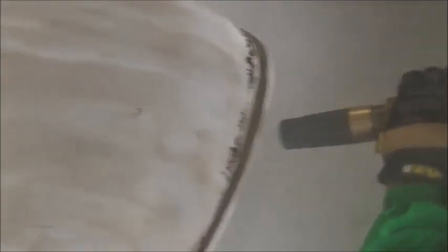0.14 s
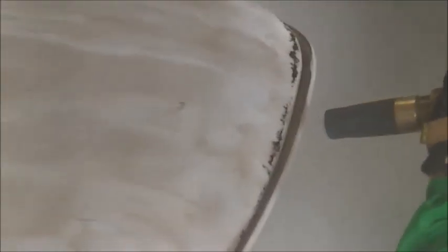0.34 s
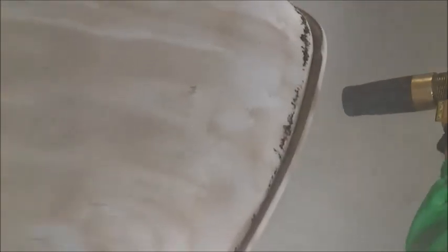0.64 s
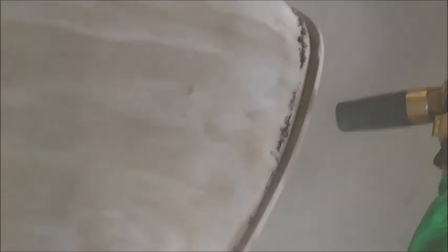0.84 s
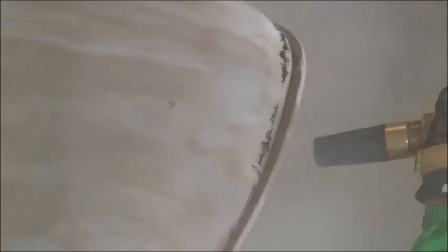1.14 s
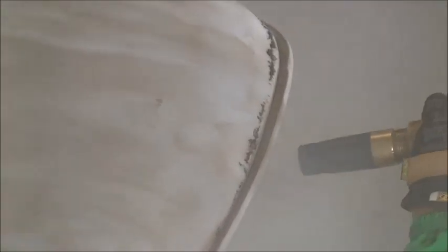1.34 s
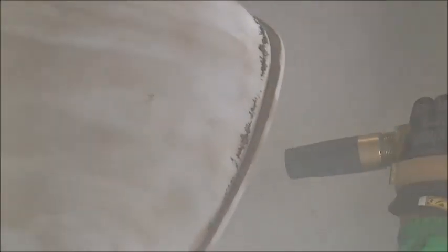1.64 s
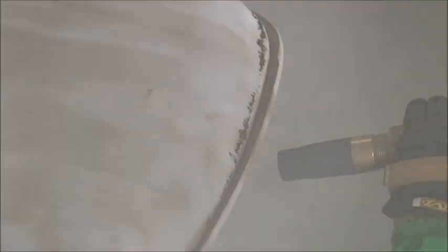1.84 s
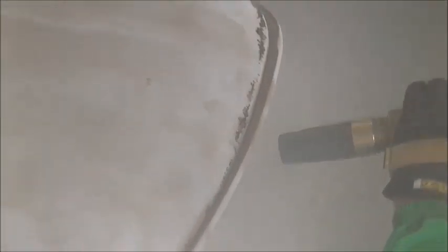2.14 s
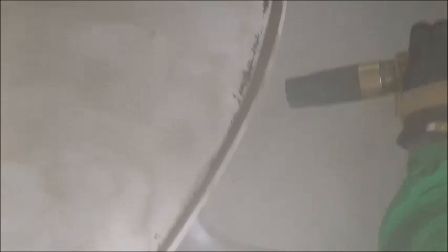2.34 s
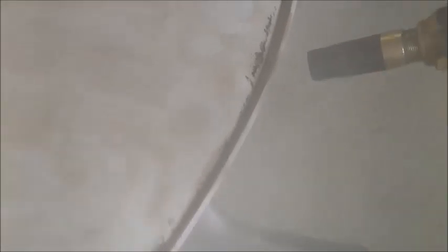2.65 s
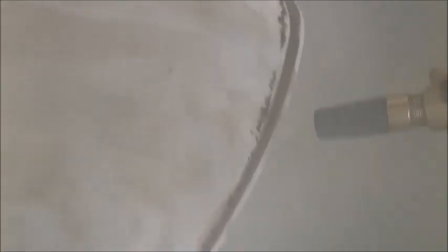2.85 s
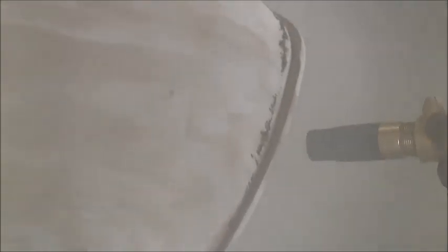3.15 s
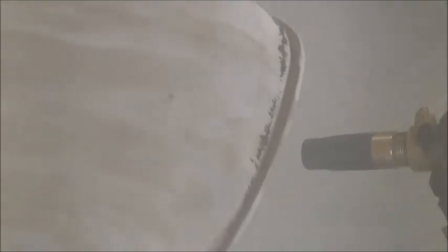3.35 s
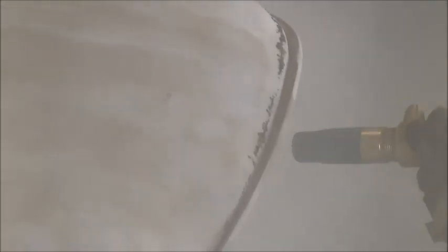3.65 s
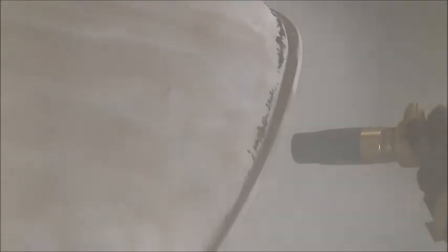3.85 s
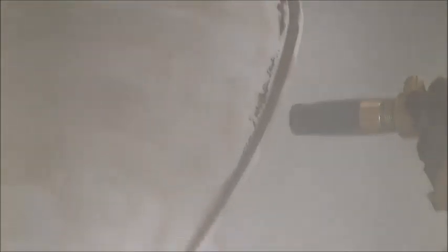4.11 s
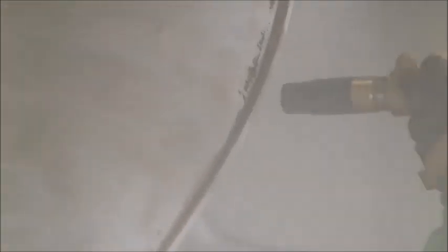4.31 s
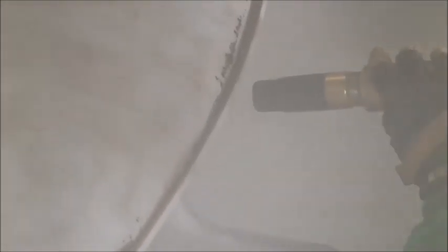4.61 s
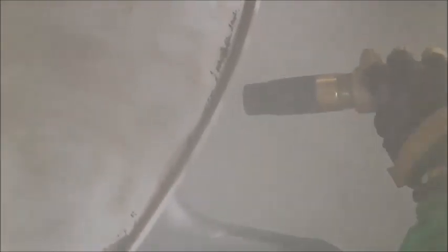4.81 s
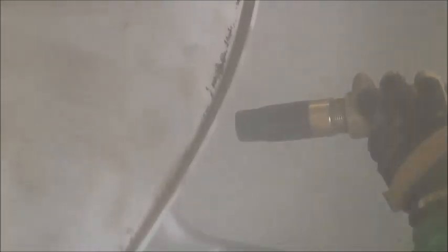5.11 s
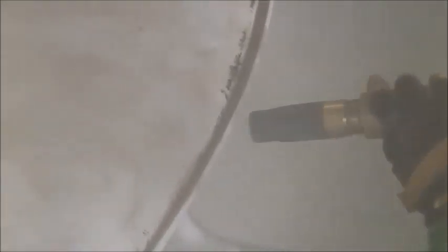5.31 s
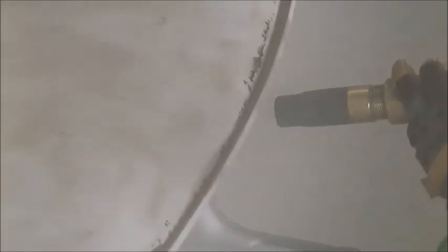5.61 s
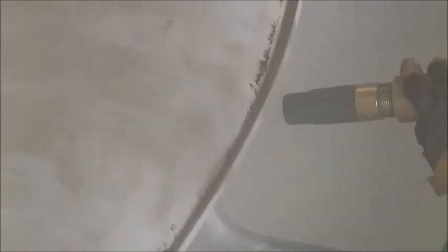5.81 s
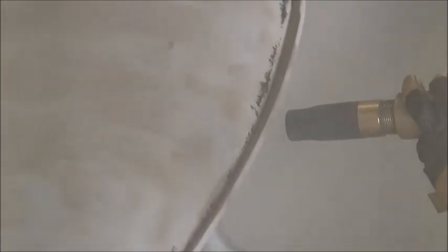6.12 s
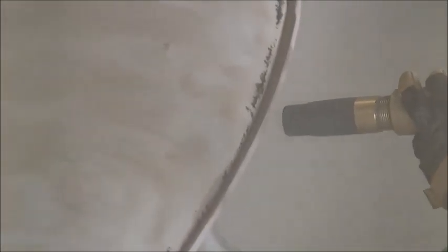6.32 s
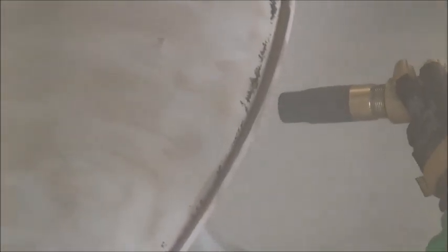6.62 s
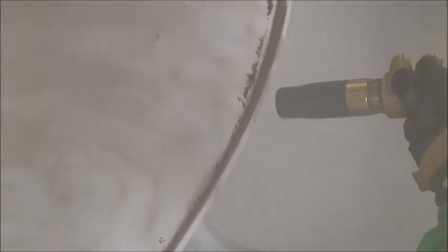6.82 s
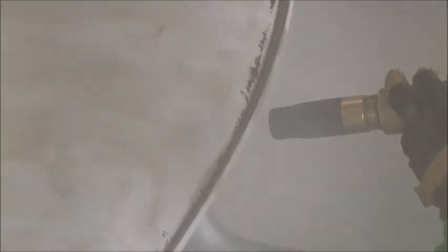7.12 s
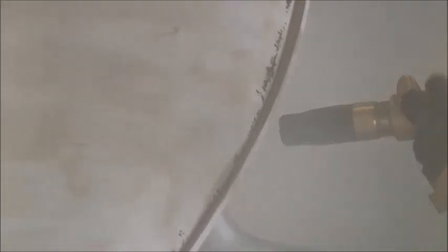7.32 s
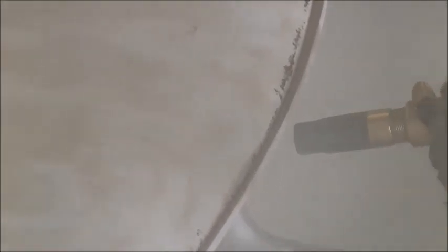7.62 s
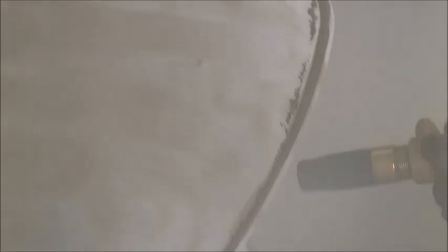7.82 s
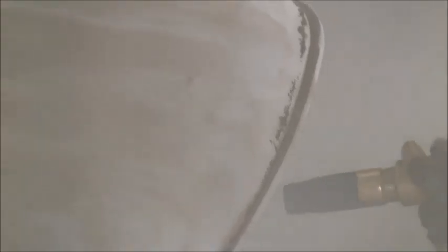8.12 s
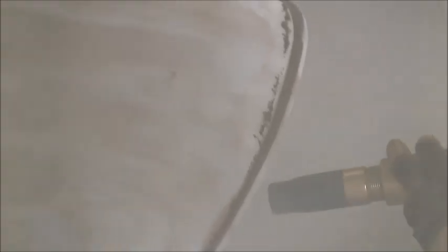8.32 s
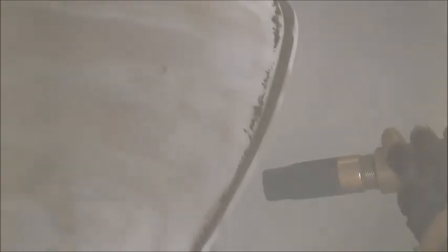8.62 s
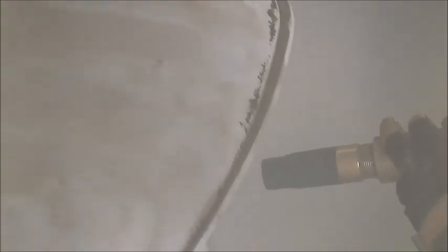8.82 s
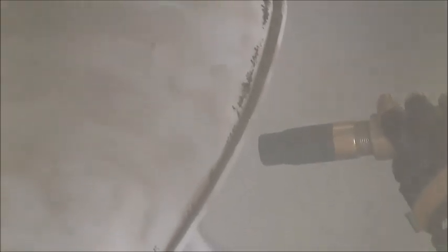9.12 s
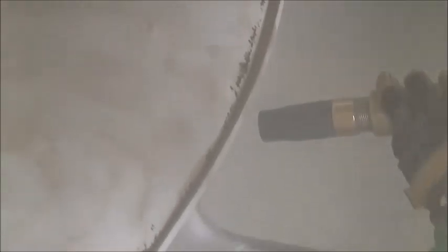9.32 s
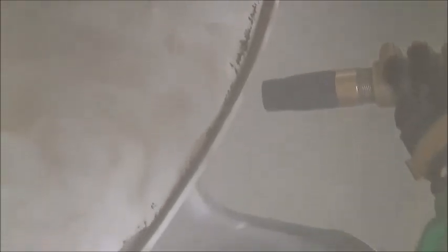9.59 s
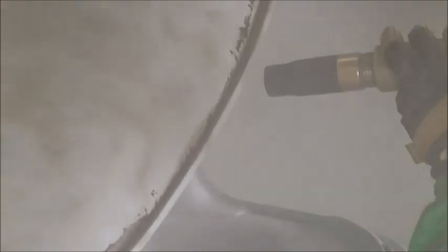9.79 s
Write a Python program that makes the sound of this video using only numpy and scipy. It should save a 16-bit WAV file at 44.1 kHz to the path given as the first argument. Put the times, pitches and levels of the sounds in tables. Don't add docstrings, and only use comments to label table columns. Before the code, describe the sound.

A loud, steady blast of compressed air and grit hisses against a steel panel, with a faint high whistle appearing late over low fan hum.

```python
import sys
import numpy as np
from scipy import signal
from scipy.fft import rfft, irfft
from scipy.io import wavfile
from scipy.ndimage import uniform_filter1d, map_coordinates

SR = 44100
rng = np.random.default_rng(int(sys.argv[2]) if len(sys.argv) > 2 else 0)


def generate_wav(signal):
    frames = np.transpose(np.atleast_2d(signal))
    scaled = np.clip(frames, -1, 1) * 32767
    pcm = np.round(scaled).astype(np.int16)
    wavfile.write(sys.argv[1], SR, pcm)


def boost_factor(decibels):
    exponent = np.asarray(decibels, float) / 20
    return 10 ** exponent


N = 438794

# t/s, jet strength/dB, how squarely it faces the panel/dB
NOZZLE_MOTION = [(0, -21, -9.2), (.5, -21, -9.5), (.9, -21.5, -9), (1.1, -21, -8), (2.3, -20.9, -8.5),
                 (3.3, -21.5, -9), (3.6, -21, -9), (4.3, -20.9, -9.5), (4.6, -21, -9.5),
                 (6.2, -21.5, -10.5), (6.8, -21.5, -10.5), (7.05, -21, -10.5), (7.6, -21, -10),
                 (8.05, -21.5, -11.5), (8.8, -21, -10.5), (9.75, -21.5, -10.5), (9.95, -20.5, -9.5)]


def unit(x):
    return x / np.sqrt(np.mean(np.abs(x) ** 2) + 1e-20)


def along(points, hz):
    f, v = np.transpose(points)
    return np.interp(np.log(hz + 1), np.log(f + 1), v)


def curves(rows, t):
    s, *cols = np.transpose(rows)
    return [np.interp(t, s, c) for c in cols]


def random_curve(knots):
    return map_coordinates(rng.standard_normal(N // 40), [knots])


def wobble(rate_hz):
    coarse = np.arange(0, N + 64, 64)
    return np.interp(np.arange(N), coarse, random_curve(coarse * rate_hz / SR))


def patches(shape, tall, long):
    field = rng.standard_normal(shape)
    for _ in range(2):
        field = uniform_filter1d(field, tall, axis=-2)
        field = uniform_filter1d(field, long, axis=-1)
    return unit(field)


def jet():
    hz, t, (a, b) = signal.stft(rng.standard_normal((2, N)), SR, nperseg=4096, noverlap=3072)
    gain_db = jet_colour(hz, t) + panel_modes(hz, t, lift=1.6, fade_s=.15)
    gain_db += fine_modes(hz, a.shape)
    gain_db += .5 * patches(a.shape, tall=120, long=2)
    spectrum = stereo_field(hz, a, b) * boost_factor(gain_db)
    hiss = unit(signal.istft(spectrum, SR, nperseg=4096, noverlap=3072)[1][:, :N])
    flow_db = curves(NOZZLE_MOTION, np.arange(N) / SR)[0]
    flutter_db = 0.19 * wobble(5) + 0.16 * wobble(18) + 0.2 * wobble(45)
    return hiss * boost_factor(flow_db + 1.64 + flutter_db)


def jet_colour(hz, t):
    # f/Hz, level/dB per Hz
    jet_spectrum = [(30, -23), (110, -16.5), (300, -12.5), (1100, -11.5), (1700, -8), (2900, -4),
                    (3200, -3), (5000, -0.5), (6000, 0.5), (6700, -2), (9000, -3.5), (12000, -5),
                    (13500, -8.5), (15800, -17)]
    # f/Hz, width/Hz, level/dB
    shock_cells = (10050, 1500, 2.5)
    # f/Hz, reach/octaves, slope/(dB per dB of facing)
    aim_zones = [
        (700, 2.6, -0.23),
        (2300, 1.16, 1),
        (11500, 0.98, -.3),
    ]
    # f/Hz, level difference/dB
    ear_lean = [(100, -0.5), (250, -.5), (1000, 0), (4200, 0.5), (4850, 2.5), (5600, -0.5), (6800, -0.5),
                (7700, 0), (9000, -1), (12500, -3), (15000, -0.5)]
    shock_hz, shock_width_hz, shock_db = shock_cells
    hump = np.exp(-(2 * (hz - shock_hz) / shock_width_hz) ** 2)
    colour_db = (along(jet_spectrum, hz) + shock_db * hump)[:, None]
    facing_db = curves(NOZZLE_MOTION, t)[1]
    facing_db = facing_db - facing_db.mean()
    for centre_hz, octaves, follows in aim_zones:
        zone = np.exp(-(np.log2(hz / centre_hz + 1e-9) / octaves) ** 2)
        colour_db = colour_db + np.outer(zone, follows * facing_db)
    lean_db = along(ear_lean, hz)[:, None]
    return colour_db + np.array([lean_db, -lean_db]) / 2


def panel_modes(hz, t, lift, fade_s):
    # t/s, length/s, f/Hz, level over the hiss/dB
    mode_rings = [(0, .45, 10240, 2.8), (0, .49, 5180, 3.5), (0, .56, 1700, 2), (.13, .82, 1370, 2.5),
                  (.6, .85, 4860, 3.6), (.74, .54, 10310, 2.5), (.79, .46, 3880, 3.2), (1.09, .79, 1760, 3),
                  (1.13, .57, 2820, 3.5), (1.49, .79, 4180, 2.2), (2.2, .62, 4950, 2),
                  (2.77, 1.72, 1740, 3), (3.6, .5, 4450, 2.2), (3.83, .34, 4180, 3.2), (3.88, .45, 3260, 3),
                  (9.6, .45, 5440, 3.8), (4.56, .43, 4130, 3), (4.82, .76, 3300, 3.2),
                  (5.03, .64, 5300, 2.8), (5.63, .72, 5220, 3.2), (5.79, 1, 1940, 3.2), (6.9, .7, 5480, 4),
                  (5.94, .58, 4185, 4.6), (7.45, .86, 1750, 2.5), (7.81, .76, 3300, 3.2),
                  (7.94, 1.72, 3110, 2.5), (8.05, .6, 4460, 4.4), (8.64, 1.32, 1740, 2.2),
                  (8.79, 1.17, 2210, 2.5), (9.31, .65, 1930, 2.8)]
    # t/s, length/s, f/Hz, level/dB
    broad_swells = [(1, .6, 1800, 2), (1.76, 1.25, 12300, 1.2), (8.9, 1.2, 5320, 1.4),
                    (4.9, 1.3, 4210, 1.4), (.9, .9, 11100, 1.3), (6.5, .5, 9320, 1.6), (2.6, .8, 4660, 1.3),
                    (7.9, 1.8, 12200, -1.5), (2.5, .9, 5250, -1.6), (.7, 1, 5450, -1.4),
                    (5.8, 1, 5470, 1.1)]
    ears_differ_db = 1.2
    gain_db = np.zeros((2, len(hz), len(t)))
    # base/Hz, growth/(Hz per Hz of pitch)
    for rows, base_hz, widens in (mode_rings, 50, .007), (broad_swells, 200, .035):
        sides = rng.uniform(-1, 1, len(rows))
        for (start_s, length_s, mode_hz, mode_db), side in zip(rows, sides):
            to_end_s = np.minimum(t - start_s, start_s + length_s - t)
            spell = np.clip(to_end_s / fade_s, 0, 1)
            width_hz = base_hz + widens * mode_hz
            near = np.abs(hz - mode_hz) < 2 * width_hz
            peak = np.exp(-(2 * (hz[near] - mode_hz) / width_hz) ** 2)
            ears_db = mode_db + ears_differ_db * side * np.array([1, -1])
            gain_db[:, near] += lift * np.multiply.outer(ears_db, np.outer(peak, spell))
    return gain_db


def fine_modes(hz, shape):
    # f/Hz, level/dB
    fine_ripple = [(700, .4), (1400, 2), (3000, 1.9), (6000, 1.6), (10000, .7)]
    per_ear = patches((2, *shape), tall=1, long=16)
    shared = patches(shape, tall=2, long=16)
    return along(fine_ripple, hz)[:, None] * (.7 * per_ear + .7 * shared)


def stereo_field(hz, a, b):
    # f/Hz, left-right likeness
    ear_likeness = [(50, 0.3), (130, -0.43), (300, -0.35), (700, -0.38), (1100, 0.03), (1700, 0.61),
                    (3200, 0.61), (5000, 0.45), (7000, 0.29), (12500, 0.24), (15000, .15)]
    # f/Hz, left lag/rad
    left_lag = [(1100, 0), (1600, .3), (3500, .12), (6000, .5), (8500, .8), (11000, .5), (14000, 0)]
    angle = np.arccos(np.clip(along(ear_likeness, hz), -1, 1))[:, None] / 2
    half_lag = np.exp(.5j * along(left_lag, hz))[:, None]
    common, opposed = a * np.cos(angle), b * np.sin(angle)
    return np.array([(common + opposed) / half_lag, (common - opposed) * half_lag])


def whistle(upper_ratio, upper_db, fade_s):
    # t/s, f/Hz, level/dB, L-R/dB
    edge_tone = [
        (7.06, 9780, -31, 0),
        (7.2, 9960, -30.5, -1.5),
        (7.45, 10090, -29, 1),
        (7.65, 10110, -31, -2.5),
        (7.95, 10210, -32, 0),
        (8.15, 10220, -27, 3),
        (8.44, 9980, -25.5, 1),
        (8.48, 10000, -35, 1),
        (9.05, 9600, -38, 0),
    ]
    t = np.arange(N) / SR
    tone_hz, tone_db, pan_db = curves(edge_tone, t)
    ears_db = [tone_db + pan_db / 2, tone_db - pan_db / 2]
    to_end_s = np.minimum(t - edge_tone[0][0], edge_tone[-1][0] - t)
    spell = np.clip(to_end_s / fade_s + 1, 0, 1)
    phase = 2 * np.pi * np.cumsum(tone_hz) / SR
    blur_hz = 120 + .5 * np.abs(10200 - tone_hz)
    knots = np.cumsum(blur_hz) / SR

    def breathy(blur, ratio):
        ears = []
        for _ in range(2):
            in_phase = random_curve(blur * knots) * np.cos(ratio * phase)
            quadrature = random_curve(blur * knots) * np.sin(ratio * phase)
            ears.append(in_phase + quadrature)
        return unit(np.array(ears))

    main = breathy(1, 1)
    main = unit(main + .35 * main[::-1])
    main = main * boost_factor(2.2 * wobble(25) - 1.2)
    return spell * boost_factor(ears_db) * (main + boost_factor(upper_db) * breathy(2, upper_ratio))


def hum():
    # f/Hz, left level/dB, right level/dB, left lead/rad
    hum_lines = [(86.1, -50.0, -51.0, 0.1), (257.7, -64.0, -62.0, 0.4), (319.0, -59.0, -60.0, 0.0),
                 (360.0, -62.0, -64.0, -0.3), (480.5, -58.0, -56.0, -0.2), (515.5, -64.0, -70.0, 0.2),
                 (537.0, -64.0, -68.0, -0.2), (600.2, -66.0, -61.0, -0.6), (720.0, -62.0, -67.0, -0.7),
                 (840.5, -64.0, -63.0, -0.6), (1080.0, -62.0, -67.0, 1.0), (1200.5, -64.0, -64.0, -0.2)]
    t = np.arange(N) / SR
    out = np.zeros((2, N))
    for line_hz, left_db, right_db, lead_rad in hum_lines:
        phase = 2 * np.pi * line_hz * t + line_hz / 1500 * wobble(3) + rng.uniform(0, 2 * np.pi)
        swell = np.sqrt(2) * boost_factor(.8 + .6 * wobble(5))
        out += swell * boost_factor([[left_db], [right_db]]) * np.sin([phase + lead_rad, phase])
    return out


def scene():
    return jet() + whistle(upper_ratio=1.145, upper_db=-8, fade_s=.04) + hum()


def roll_off(x):
    return signal.sosfilt(signal.butter(12, 15745, fs=SR, output="sos"), x)


def record(dry):
    bent = dry - .55 * (dry ** 2 - np.mean(dry ** 2))
    hz = np.fft.rfftfreq(N, 1 / SR)
    low_cut = hz ** 2 / np.hypot(hz ** 2, 50 ** 2)
    mix = irfft(rfft(bent) * low_cut, N)
    return roll_off(mix)


dry = scene()
out = record(dry)
generate_wav(out)
```